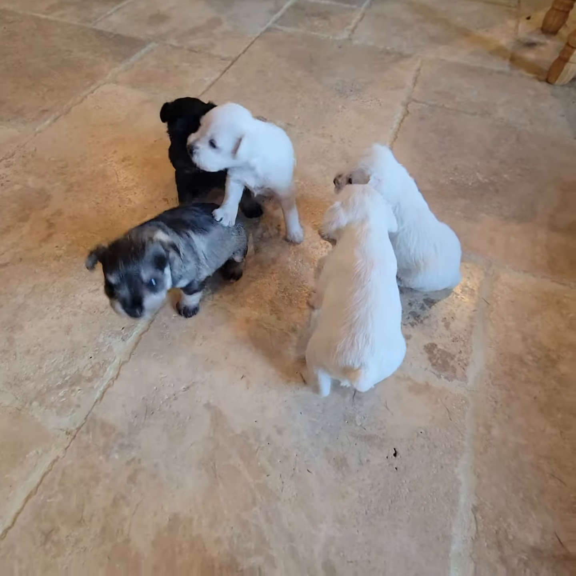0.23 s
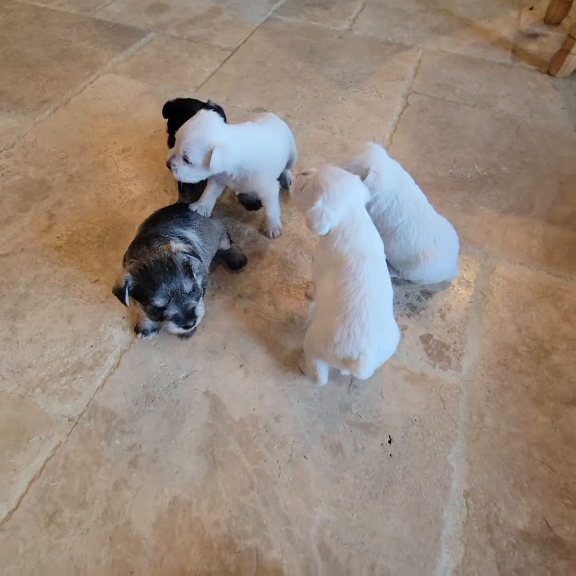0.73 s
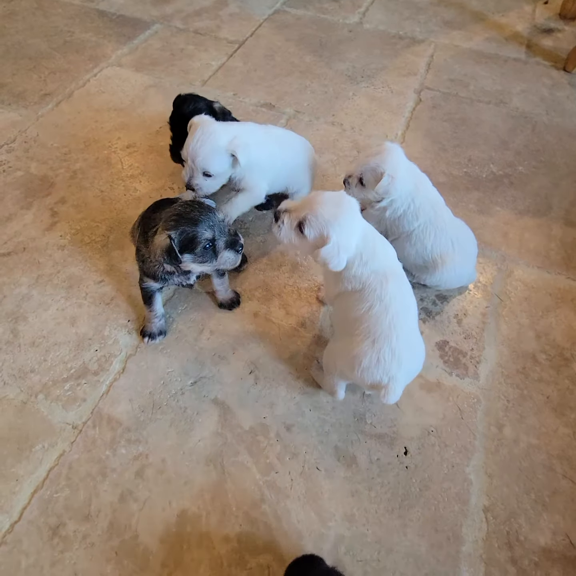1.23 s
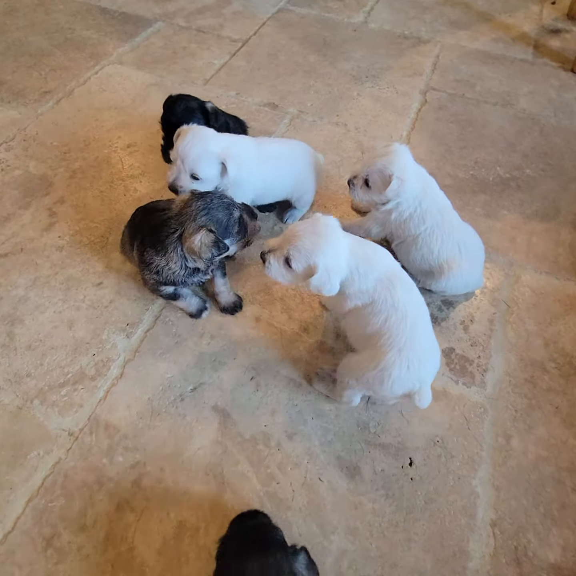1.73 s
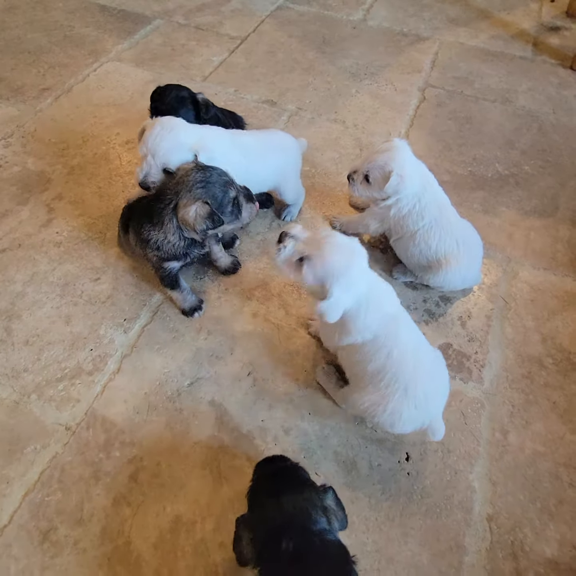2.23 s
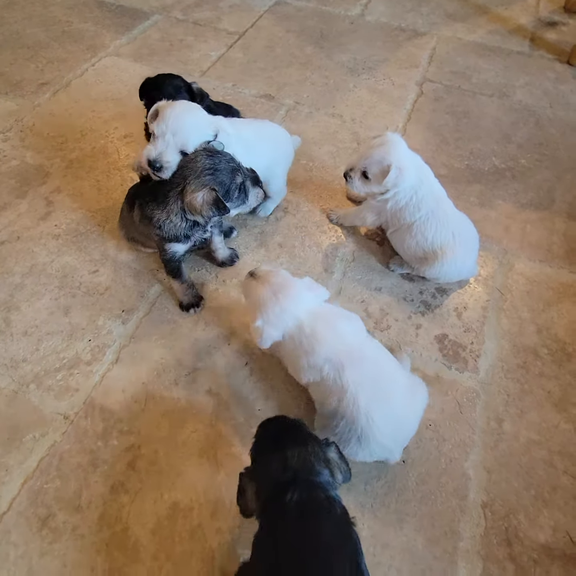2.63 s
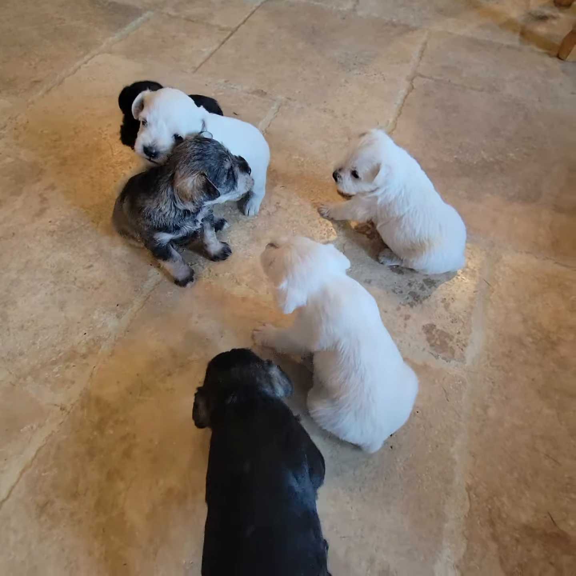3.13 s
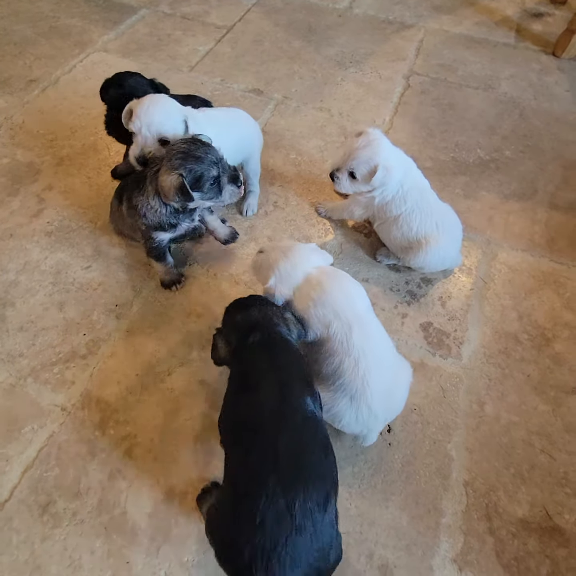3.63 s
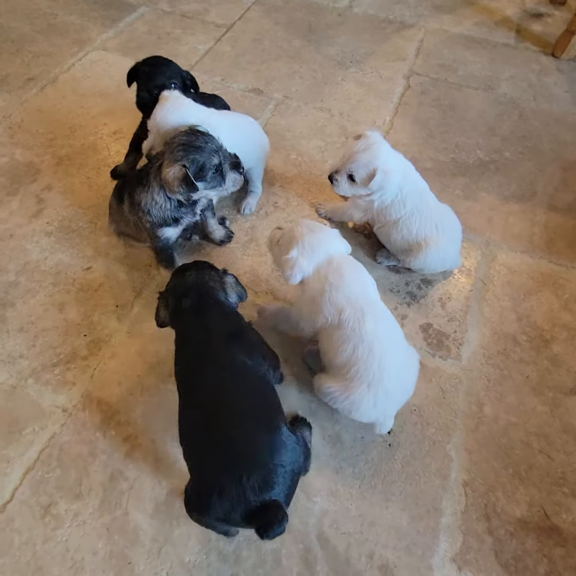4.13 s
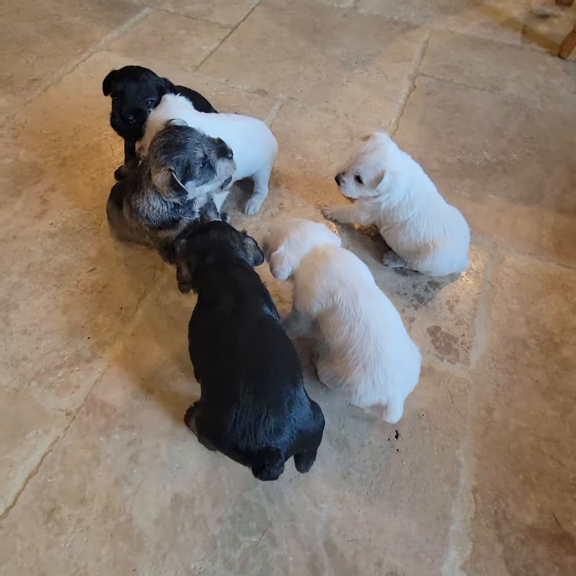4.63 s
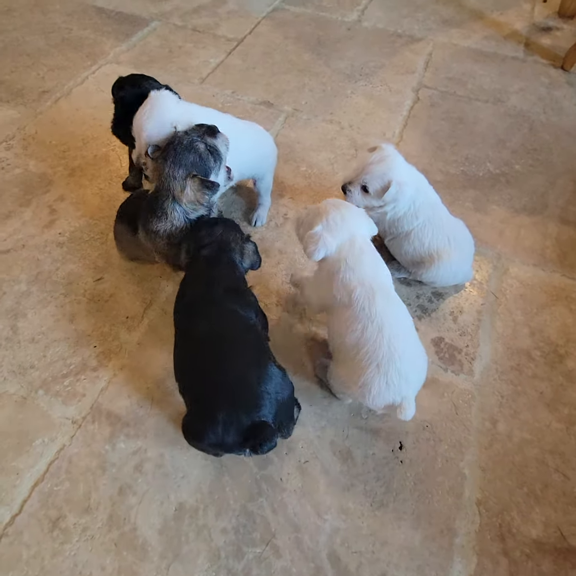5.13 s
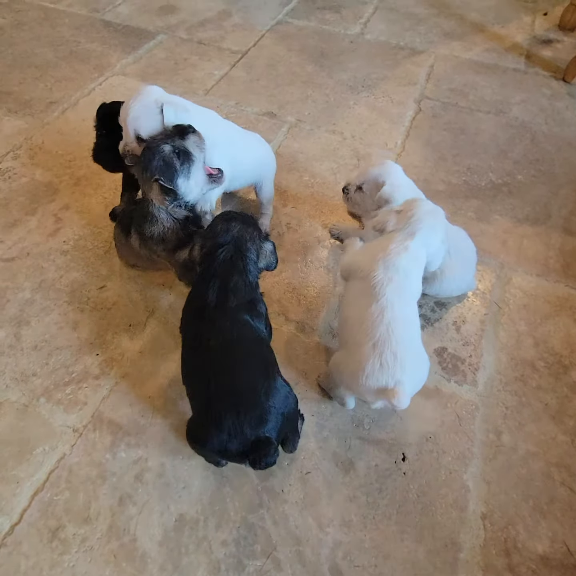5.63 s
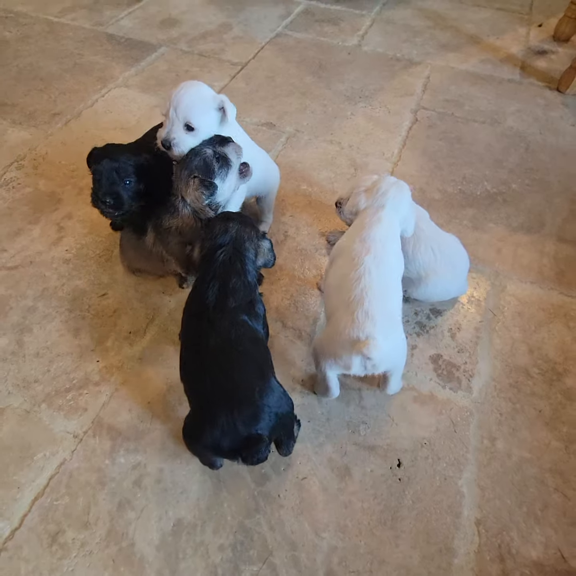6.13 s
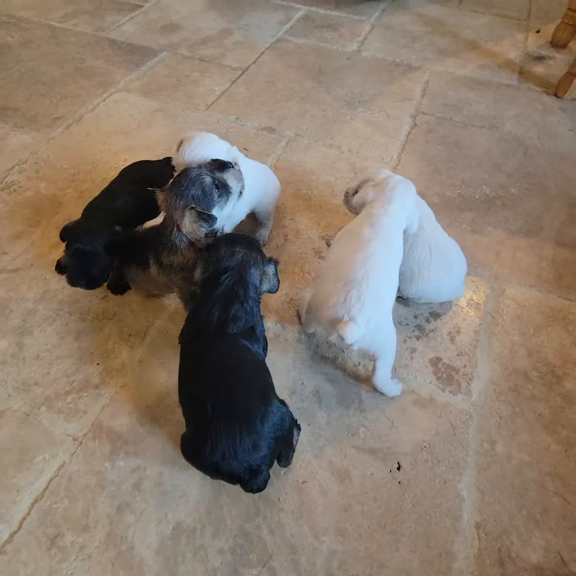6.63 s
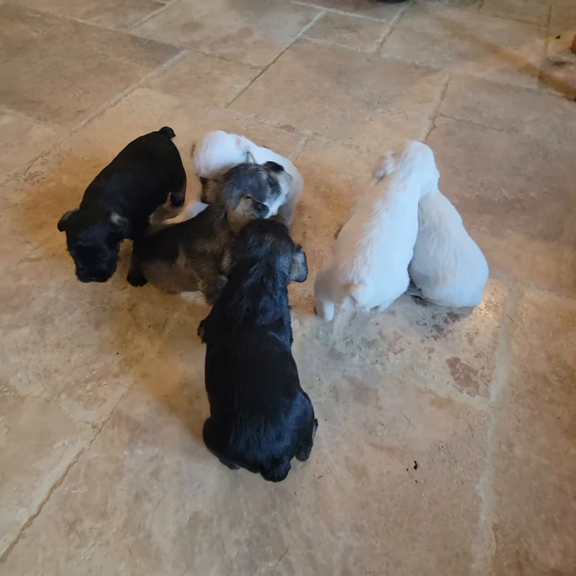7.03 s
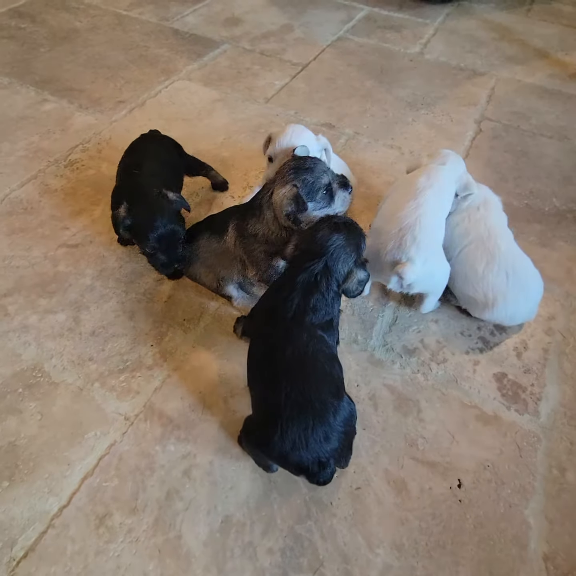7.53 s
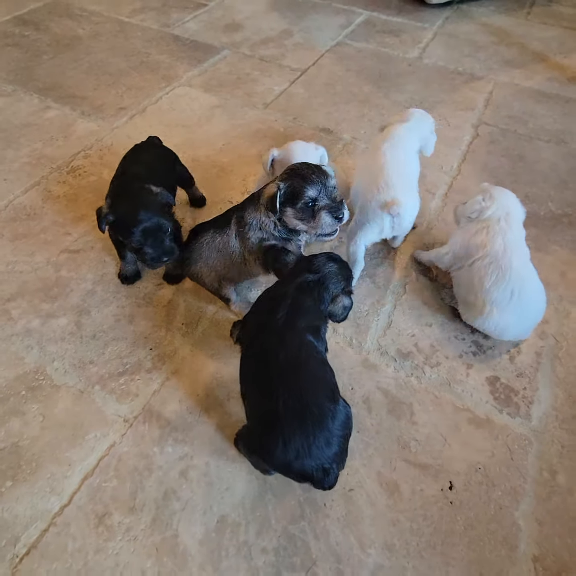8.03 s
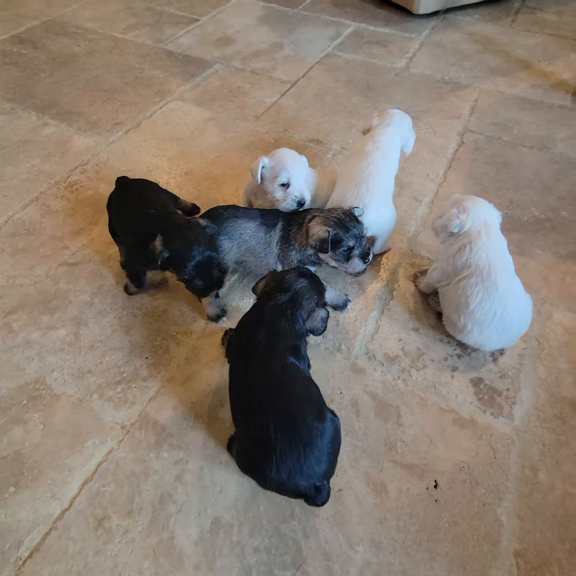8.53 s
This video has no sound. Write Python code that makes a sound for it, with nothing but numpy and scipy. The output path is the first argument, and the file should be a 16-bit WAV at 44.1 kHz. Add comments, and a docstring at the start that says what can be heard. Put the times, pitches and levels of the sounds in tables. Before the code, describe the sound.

Young puppies scuffle on a hard tiled floor, giving fluttering little growls, sharp yelps, gliding squeals and whimpers over a low appliance hum.

```python
"""In a hard, ringing room, young puppies wrestle on a tiled floor, a metre or so from the microphone.
They growl in fluttering bouts, grunt, whimper and break into gliding squeals and yelps.
Voices are gliding partials or rough pulses shaped by throat and mouth; paws and claws on the tiles
are short noise. An appliance hums low: a wavering tone over filtered noise."""
import sys
import numpy as np
from scipy import signal
from scipy.fft import rfft, irfft
from scipy.io import wavfile
from scipy.ndimage import uniform_filter1d

SR = 44100
rng = np.random.default_rng(int(sys.argv[2]) if len(sys.argv) > 2 else 0)


def generate_wav(sig):
    """Save sig (samples, or channels by samples) to the path in sys.argv[1] as 16-bit PCM at SR."""
    pcm = np.round(np.clip(np.atleast_2d(sig).T, -1, 1) * 32767).astype(np.int16)
    wavfile.write(sys.argv[1], SR, pcm)


N = 387638
T = np.arange(N) / SR  # seconds
TOP_HZ = 15700  # nothing sounds much above this


def undb(db):
    """Turn decibels into gain."""
    return 10 ** (np.asarray(db) / 20)


def unit(x):
    """Scale to an rms (average strength) of 1."""
    return x / np.sqrt(np.mean(x ** 2))


def at_hz(points, hz):
    """Read a curve of (Hz, value) points, with pitch spaced by ratio as the ear hears it."""
    point_hz, values = np.transpose(points)
    return np.interp(np.log(hz + 1e-6), np.log(point_hz), values)


def band(x, hz, width):
    """Ring at one pitch; filtering twice makes the sides steep (width in Hz is that of one pass)."""
    b, a = signal.iirpeak(min(hz, SR / 2 - 2000), hz / width, fs=SR)
    once = signal.lfilter(b, a, x)
    return signal.lfilter(b, a, once)


def resonate(source, modes):
    """Sound a tube's resonances together; neighbours alternate in sign."""
    total = 0
    for k, (hz, width, db) in enumerate(modes):
        total = total + (-1) ** k * undb(db) * band(source, hz, width)
    return unit(total)


def wobble(rate, size):
    """Wander at random with rms 1, heading for a new value rate times a second."""
    t = np.arange(size) / SR * rate
    knots = int(t[-1]) + 2
    return unit(np.interp(t, np.arange(knots), rng.standard_normal(knots)))


def gesture(rows, fade):
    """Give the times, soft gate and control curves of one call; fade in seconds."""
    s, *columns = np.transpose(rows)
    t = T[(T > s[0] - fade) & (T < s[-1] + fade)]
    from_edge = np.minimum(t - t[0], t[-1] - t)
    gate = np.sin(np.pi / 2 * np.clip(from_edge / fade, 0, 1)) ** 2
    return t, gate, [np.interp(t, s, column) for column in columns]


def during(t, stretches):
    """Let a state of the voice swell and pass, from rows of centre s, length s and strength."""
    return sum(strength * np.exp(-((t - s) / length) ** 2) for s, length, strength in stretches)


def layer(sounds):
    """Mix sounds, given as (start in seconds, samples), into one track."""
    out = np.zeros(N)
    for s, x in sounds:
        i = max(int(s * SR), 0)
        out[i:i + len(x)] += x[:N - i]
    return out


def diffuse(size, apart_hz):
    """Noise spectra from all sides at two ports: alike in the bass, unrelated in the treble."""
    hz = np.arange(size // 2 + 1) * SR / size
    alike = 1 / (1 + (hz / apart_hz) ** 2)
    mid, side = rfft(rng.standard_normal((2, size)))
    signs = np.array([[1], [-1]])
    return hz, (mid * np.sqrt(1 + alike) + signs * side * np.sqrt(1 - alike)) / np.sqrt(2)


def hum(level_db=-45.0, motor_hz=95, motor_db=-52):
    """A motor hums as a wavering tone over a low drone and faint hiss of filtered noise."""
    # The appliance and the still room. Each row: pitch in Hz, relative level in dB per Hz.
    drone_colour = [(25, -32), (52, -13.5), (70, -7.5), (95, 0), (112, -10.5), (138, -11.5), (200, -22.5),
                    (900, -36.5), (3500, -52.5), (15000, -56)]
    hz, noise = diffuse(N, apart_hz=600)
    drone = unit(irfft(noise * undb(at_hz(drone_colour, hz)), N))
    motor_phase = 2 * np.pi * np.cumsum(motor_hz * (1 + 0.02206 * wobble(6.9, N))) / SR
    motor = np.sin(motor_phase) * undb(1.2 * wobble(0.79, N))
    return undb(level_db) * drone + undb(motor_db) * motor


def growl(rows, teeth_db, uneven):
    """Slack folds sound in bursts through a slow flutter, which bends their pitch; air adds hiss."""
    # Resonances of throat, open mouth and teeth. Each row: pitch in Hz, width in Hz, level in dB.
    throat_modes = [(340, 390, -6.5), (556, 305, 1), (1880, 380, -11.5)]
    mouth_modes = [(1009, 564, 9.5), (1360, 1405, -1.5), (3300, 540, -13)]
    teeth_modes = [(2330, 720, 8), (5140, 4500, -14), (12640, 1300, -13)]
    tone_db = 1.5  # beside the throat sound
    chaos, drift, swing = .1, .1, .13  # shares of the fold rate: fast wander, slow wander, flutter
    scatter_db, flap_db = 3.5, 1.0  # random spread in strength: of the folds, of the flaps
    t, gate, (db, open_db, flaps, fold_hz) = gesture(rows, fade=0.014)
    size = len(t)
    flutter = 2 * np.pi * np.cumsum(flaps * (1 + uneven * wobble(30, size))) / SR - np.pi / 3
    # slow flaps all but shut the throat, quick ones only ripple the flow
    opening = np.sqrt(np.maximum(1 + 32 / flaps * np.cos(flutter), .01))
    burst = opening * undb(flap_db * wobble(35, size))
    wander = chaos * wobble(400, size) + drift * wobble(14, size)
    fold_rate = fold_hz * (1 + wander + swing * np.cos(flutter + np.pi / 4))
    cycles = np.cumsum(fold_rate) / SR
    strength = undb(scatter_db * wobble(400, size))
    # one click for each completed cycle of the folds
    pulses = unit((np.diff(np.floor(cycles), prepend=0) > 0) * strength)
    tone = unit(np.sin(2 * np.pi * cycles) * strength * burst)
    throat_source = (pulses + rng.standard_normal(size)) * burst
    breath = rng.standard_normal(size) * (1 + np.cos(2 * np.pi * cycles))
    rush = (0.6 * pulses + breath) * burst
    throat = resonate(throat_source, throat_modes)
    mouth = undb(open_db) * resonate(rush, mouth_modes)
    teeth = undb(teeth_db) * resonate(rush, teeth_modes)
    voice = undb(tone_db) * tone + throat + mouth + teeth
    # a small chest radiates little below 220 Hz
    chest = signal.butter(6, 220, "high", fs=SR, output="sos")
    return t[0], signal.sosfilt(chest, voice * undb(db) * gate)


def bout(s, hold, release, db, open_db, flaps, fold_hz=319.8, fade_db=9.5):
    """A growl holds, then lets go by fade_db, with the jaw and the slack folds' basic rate held still."""
    levels = [(s, db), (s + hold, db), (s + hold + release, db - fade_db)]
    return [(at, level, open_db, flaps, fold_hz) for at, level in levels]


def growl_bouts():
    """Puppies growl with a fluttering throat, each bout held and then let go."""
    # Each row: start in seconds, hold in seconds, release in seconds, throat level in dB,
    # open-mouth share in dB, hiss through the teeth in dB, flutter in flaps per second.
    bouts = [ (0, 0.072, 0.15, -40, 5, -12.5, 53), (.39, 0.64, .12, -51, -7.5, -16.5, 41),
             (1.767, 0.081, 0.052, -41.5, -7.5, -4.5, 34.8), (2.558, 0.056, 0.036, -43.5, 1.5, -2.5, 41.4),
             (2.65, .14, .11, -46.5, -2.5, -9, 33), (3.391, 0.18, 0.047, -47, -3, -10, 31),
             (3.843, 0.2764, 0.018, -50.5, -7, -30, 27), (4.199, .4, .13, -41, -2, -10.5, 38),
             (4.947, 0.2, 0.025, -46, -4.5, -16, 27.8), (5.888, 0.18, 0.043, -47, 1, -9, 30.5), ]
    return layer(growl(bout(*shape, flaps), teeth_db, uneven=.22) for *shape, teeth_db, flaps in bouts)


def cry(rows, tract, jitter, air_db, flicker_db, jaw_db=0):
    """Vocal folds glide through the tract's resonances, row by row: s, Hz, dB, overtone slope dB/octave."""
    # Where a cry breaks into a rasp. Each row: centre in seconds, length in seconds, roughness 0-1.
    rasp_times = [(1.995, 0.022, 0.68), (3.297, 0.019, 0.54), (3.717, 0.014, 0.46), (4.196, 0.028, 0.3),
                  (5.372, 0.016, 0.24), (6.085, 0.012, 0.14), (6.512, 0.028, 0.24), (6.163, 0.016, 0.28)]
    # Where a strained cry throbs. Each row: centre in seconds, length in seconds, depth 0-1.
    throb_times = [(2.049, 0.026, 1), (6.155, 0.0079, 1)]
    # open jaw: centre in Hz at full effort, half width in octaves, share the centre climbs with effort
    jaw_hz, jaw_octaves, jaw_rise = 2720, 0.38, 0.14
    t, gate, (hz, db, slope_db) = gesture(rows, fade=.007)
    size = len(t)
    rough = 0.033 + during(t, rasp_times)
    unsteady = jitter * wobble(160.8, size) + 0.089 * rough * wobble(900, size)
    hz = uniform_filter1d(hz, size=200) * (1 + unsteady)
    phase = 2 * np.pi * np.cumsum(hz) / SR
    k = np.arange(1, 25, .5)[:, None]  # partial numbers, with the halfway ones
    partial_hz = k * hz
    # tongue and lips never hold still, so each partial wavers on its own
    flicker = flicker_db * np.array([wobble(114.8, size) for _ in k])
    # the jaw drops with effort: its resonance climbs and grows
    effort = undb(db - db.max())
    jaw_centre = jaw_hz * (1 + jaw_rise * (effort - 1))
    jaw = jaw_db * effort * np.exp(-(np.log2(partial_hz / jaw_centre) / jaw_octaves) ** 2)
    gain_db = at_hz(tract, partial_hz) + jaw + slope_db * np.log2(k) + flicker
    gains = undb(gain_db) * (partial_hz < TOP_HZ)
    # in a rasp every other cycle is stronger, which puts lines halfway between the partials
    gains = gains * np.where(k % 1, rough, 1)
    gains = gains / np.sqrt(np.sum(gains ** 2, axis=0) / 2)
    voice = np.sum(gains * np.sin(k * phase), axis=0)
    # uneven closures throw sidebands round every partial
    voice = voice * (1 + 0.43 * rough * wobble(900, size))
    # under strain a second, slow vibration near 116 Hz chops the voice
    throb = np.cos(2 * np.pi * np.cumsum(116.4 * (1 + 0.22 * wobble(78, size))) / SR)
    voice = voice * (1 + during(t, throb_times) * throb)
    # air escapes once a cycle and takes the colour of the tract
    air = rfft(rng.standard_normal(size) * (1 + np.cos(phase)))
    air = unit(irfft(air * undb(at_hz(tract, np.arange(len(air)) * SR / size)), size))
    return t[0], (voice + undb(air_db + slope_db) * air) * gate * undb(db)


def pressed(rows, slope_db):
    """Pressing harder strengthens overtones: slope_db per octave at the loudest, less when softer."""
    t, hz, db = np.transpose(rows)
    brighten = 0.21  # dB per octave gained per dB of effort
    return np.column_stack([t, hz, db, slope_db + brighten * (db - db.max())])


def arch(s, rise, fall, first_hz, top_hz, last_hz, bend=1.6):
    """Give the times and pitch of a call that bends to a middle pitch and away again."""
    t = np.linspace(s, s + rise + fall, 80)
    away = np.interp(t, [s, s + rise, s + rise + fall], [1, 0, 1]) ** bend
    return t, top_hz + away * (np.where(t < s + rise, first_hz, last_hz) - top_hz)


def whimper(s, rise, fall, first_hz, top_hz, last_hz, db, slope_db):
    """A weak call is loudest at the turn of its arch: 5 dB softer at the start, 3.5 at the end."""
    t, hz = arch(s, rise, fall, first_hz, top_hz, last_hz)
    effort = np.interp(t, [s, s + rise, t[-1]], [-5, 0, -3.5])
    return np.column_stack([t, hz, db + effort, np.full_like(t, slope_db)])


def whimpers():
    """Soft cries with little effort leave through the nose, which colours their partials."""
    # Each row: start in seconds, rise in seconds, fall in seconds, first pitch in Hz,
    # pitch at the turn in Hz, last pitch in Hz, level at the turn in dB, overtone slope in dB per octave.
    soft_cries = [ (0.317, 0.0038, 0.031, 868, 778, 623, -39, 3),
                  (2.942, 0.034, 0.12, 1201, 1040, 1021, -49.5, 9),
                  (3.123, 0.031, 0.052, 514, 445, 456, -47.5, -13),
                  (5.263, 0.035, 0.079, 1600, 1275, 1310, -47.5, -0.5),
                  (5.638, 0.014, 0.091, 1043, 889, 491, -35, 0.5),
                  (6.54, 0.018, 0.074, 604, 609, 664, -36, 2.5),
                  (6.822, 0.054, 0.022, 454.4, 817, 630, -37, 1),
                  (7.078, 0.014, 0.01, 358, 432, 434, -40.5, -2.5),
                  (7.269, 0.0097, 0.0097, 552, 588, 582, -41, -2),
                  (7.463, 0.048, 0.01, 690.5, 772, 733, -36, 1),
                  (7.74, 0.041, 0.066, 600, 823, 637, -38, 2.5),
                  (8.518, 0.024, 0.069, 591, 665, 460, -39, -0.5), ]
    # The nose as a sound filter. Each row: pitch in Hz, level in dB.
    nose = [(450, 1.5), (850, 6.5), (1150, 0.5), (1500, -14), (2200, -15), (4500, -50), (7000, -29),
            (9000, -56.5), (11500, -27.5), (15000, -49.5)]
    return layer(cry(whimper(*row), nose, jitter=0.013, air_db=-13.5, flicker_db=5.5)
                 for row in soft_cries)


def click(hz, db):
    """A claw or tooth ticks: ringing noise that dies away within milliseconds."""
    t = T[:SR // 30]
    return undb(db) * unit(band(rng.standard_normal(len(t)), hz, hz)) * np.exp(-t / 0.0029)


def clicks():
    """Claws and teeth click, each tick at its own pitch."""
    # Each row: start in seconds, pitch in Hz, level in dB.
    ticks = [(.375, 4660, -42), (.429, 3000, -49), (1.009, 3970, -31.5), (1.341, 2300, -34.5),
             (1.47, 5800, -49.5)]
    return layer((s, click(hz, db)) for s, hz, db in ticks)


def grunts():
    """A grunt is a growl too short for even one whole flap of the flutter."""
    # Each row: start in seconds, basic rate of the vocal folds in Hz, throat level in dB.
    single_grunts = [(0.378, 637, -43), (0.598, 563, -47), (1.521, 674, -52.5), (5.955, 450, -43),
                     (6.981, 366, -52), (7.315, 408, -61.5), (7.556, 422, -55.5)]
    sounds = []
    for s, fold_hz, db in single_grunts:
        rows = [(s, db, -6, 10, fold_hz), (s + 0.055, db, -10, 10, fold_hz)]
        sounds.append(growl(rows, teeth_db=-15, uneven=0))
    return layer(sounds)


def scuffs():
    """Pads and claws catch on the tile in dense tiny grains, made of flickering noise."""
    # Paws sliding. Each row: centre in seconds, length in seconds, level in dB.
    slides = [(0.642, 0.069, -55), (0.975, 0.051, -52)]
    grains = rng.standard_normal(N) * undb(4.3 * wobble(270, N))
    loudness = during(T, [(s, length, undb(db)) for s, length, db in slides])
    return unit(band(grains, 3700, 9300)) * loudness


def bump(db):
    """A soft body thumps on the tile: low noise round 230 Hz dies away fast."""
    t = T[:SR // 10]
    return undb(db) * unit(band(rng.standard_normal(len(t)), 230, 590)) * np.exp(-t / 0.0074)


def bumps():
    """Bodies meet the floor in dull thumps."""
    # Each row: start in seconds, level in dB.
    thumps = [(1.34, -28), (8.756, -35.5)]
    return layer((s, bump(db)) for s, db in thumps)


def squeal(rows):
    """Overtones die away as the pitch climbs from 1460 to 1650 Hz, thinning to a whistle."""
    hz = np.transpose(rows)[1]
    return pressed(rows, np.interp(hz, (1460, 1650), [-2, -11]))


def squeals():
    """Long gliding squeals pass through a half-shut mouth, which colours their partials."""
    # One list of rows for each squeal. Each row: time in seconds, pitch in Hz, level in dB.
    long_squeals = [
        [(1.952, 485, -33.5), (1.968, 627, -32.5), (1.976, 1073, -17), (2.015, 1500, -21.5), (2.055, 1647, -16),
         (2.087, 1659, -13), (2.113, 1650, -15.5), (2.133, 1585, -20.5), (2.158, 1449, -36), (2.197, 928, -31),
         (2.208, 542.4, -30.5), (2.28, 317.7, -42)],
        [(5.318, 702, -37), (5.342, 1150, -28), (5.362, 1011, -25.5), (5.392, 1112, -22), (5.415, 1495, -27.5),
         (5.472, 1760, -21.5), (5.497, 1782, -19.5), (5.519, 1720, -14), (5.528, 1598, -27.5),
         (5.545, 1256, -32), (5.568, 867, -38)],
    ]
    # A half-shut mouth as a sound filter. Each row: pitch in Hz, level in dB.
    half_shut = [(450, -8.5), (1100, -8.5), (1750, -5), (2350, -4.5), (3300, -17), (5200, -17), (6700, -15),
                 (8600, -25.5), (11500, -11), (15000, -42)]
    return layer(cry(squeal(rows), half_shut, jitter=0.0098, air_db=-18.5, flicker_db=3.5)
                 for rows in long_squeals)


def yelps():
    """Short open-mouthed yelps climb and drop; the loudest breaks upwards twice, its jaw wide."""
    # One list of rows for each yelp. Each row: time in seconds, pitch in Hz, level in dB.
    short_yelps = [
        [(3.182, 674, -42), (3.212, 909, -29.5), (3.228, 945.5, -20), (3.244, 1003, -16.5), (3.26, 825, -20.5),
         (3.279, 762, -26), (3.294, 515, -30.5), (3.322, 455, -33.5)],
        [(3.636, 654, -42), (3.651, 802, -24.5), (3.662, 826, -21), (3.685, 1067, -23), (3.7, 815, -35),
         (3.718, 759, -28.5), (3.735, 439, -31.5), (3.758, 400.5, -32)],
        [(6.428, 734, -36.5), (6.446, 746, -30.5), (6.461, 887, -18), (6.474, 938.4, -22.5), (6.489, 815, -24),
         (6.513, 840, -28), (6.527, 628, -35)],
    ]
    # The loudest yelp. Each row: time in seconds, pitch in Hz, level in dB.
    shriek = [(6.076, 879, -38.5), (6.086, 998, -23), (6.104, 1047, -13), (6.112, 1424, -14.5),
              (6.126, 1341, -15.5), (6.133, 1234, -12), (6.14, 1123, -16.5), (6.149, 970, -30.5),
              (6.157, 1312, -26.5), (6.167, 1146, -29.5), (6.178, 887, -29.5)]
    # Open throat and mouth as a sound filter. Each row: pitch in Hz, level in dB.
    open_throat = [(450, -0.5), (750, -5.5), (1100, -11.5), (1900, 3.5), (2700, -3), (3550, -33.5),
                   (4600, -13), (5400, -8), (6800, -22), (8600, -29), (11500, -22), (15000, -42.5)]
    sounds = [cry(pressed(rows, 0), open_throat, jitter=.012, air_db=-18, flicker_db=4.5)
              for rows in short_yelps]
    sounds.append(cry(pressed(shriek, 3), open_throat, jitter=.005, air_db=-24, flicker_db=3.5, jaw_db=8))
    return layer(sounds)


def yap():
    """A hoarse, airy yap opens a growl, its lips drawn back."""
    # Each row: time in seconds, pitch in Hz, level in dB.
    hoarse_yap = [(4.126, 494, -40), (4.138, 563, -35), (4.153, 478.6, -35), (4.168, 710, -32.5),
                  (4.184, 535.6, -33), (4.216, 484, -38)]
    # A mouth with the lips drawn back, as a sound filter. Each row: pitch in Hz, level in dB.
    bared = [(500, -0.5), (1050, 6.5), (1450, 3.5), (2100, -2), (2700, -19), (3600, -22), (4800, -21),
             (7000, -30), (12000, -31), (15000, -43.5)]
    return layer([cry(pressed(hoarse_yap, 0), bared, jitter=0.0203, air_db=-7, flicker_db=6.5)])


def long_growl():
    """In the long last growl the mouth opens, then shuts as the flutter slows."""
    # Each row: time in seconds, throat level in dB, open-mouth share in dB,
    # flutter in flaps per second, basic rate of the vocal folds in Hz.
    last_growl = [(7.816, -48, -8.5, 28.6, 340), (8.03, -42.5, 4.5, 27.7, 365), (8.13, -42, 7, 25.9, 365.4),
                  (8.25, -41.5, 9.5, 24.6, 374), (8.3, -35.5, 2.5, 25.1, 432.2),
                  (8.335, -38.5, -8, 25, 486.7), (8.38, -39, -18, 21, 376), (8.405, -44, -21, 12.6, 340)]
    return layer([growl(last_growl, teeth_db=-16.5, uneven=0.0397)])


def room(x, tail_db, early_db, lead_ms):
    """Direct sound reaches the left port first; floor and furniture answer at once, walls ring on."""
    # How long the room rings. Each row: pitch in Hz, time to fade by 60 dB in seconds.
    ring_times = [(400, 0.88), (2000, 0.79), (5500, 0.62), (13000, 0.38)]
    t = T[:SR]
    hz, noise = diffuse(SR, apart_hz=600)
    tail = 0
    for centre, t60 in ring_times:
        # this band's share of the noise fades out towards its neighbours
        share = at_hz([(f, f == centre) for f, _ in ring_times], hz)
        tail = tail + irfft(noise * share, SR) * np.exp(-np.log(1000) * t / t60)
    tail = unit(tail * np.clip((t - .006) / 0.0023, 0, 1))
    early_noise = irfft(diffuse(SR, apart_hz=710)[1], SR)
    early = unit(early_noise * np.exp(-t / 0.011) * (t > .002))
    answer = (undb(tail_db) * tail + undb(early_db) * early) / np.sqrt(SR)
    echoes = signal.fftconvolve(x[None], answer, axes=1)[:, :N]
    return np.array([x, np.roll(x, int(lead_ms * SR / 1000))]) + echoes


def scene():
    """Cries, growls, grunts and paws share the room with the hum."""
    low = growl_bouts() + clicks() + grunts() + scuffs() + bumps() + long_growl()
    thin = whimpers() + squeals()
    cries = yelps() + yap()
    return (room(low, tail_db=-8.5, early_db=-5, lead_ms=0.18)
            + room(thin, tail_db=-8.0, early_db=-3.5, lead_ms=.15)
            + room(cries, tail_db=-6.5, early_db=-3.5, lead_ms=.13) + hum())


def record(dry):
    """The two ports differ a little in colour and the top is cut; the shriek's sharpest peaks stay under a
    fixed ceiling."""
    # The left port is quieter, mostly in the treble. Each row: pitch in Hz, left minus right in dB.
    left_minus_right = [(2800, -1.4), (5200, -10), (7500, -6.5), (12000, -6)]
    balance = at_hz(left_minus_right, np.arange(N // 2 + 1) * SR / N)
    ports = irfft(rfft(dry) * undb(np.array([balance, -balance]) / 2), N)
    top_cut = signal.ellip(10, .2, 80, TOP_HZ, fs=SR, output="sos")
    return signal.sosfilt(top_cut, np.clip(ports, -.85, .85))


dry = scene()
out = record(dry)
generate_wav(out)
```